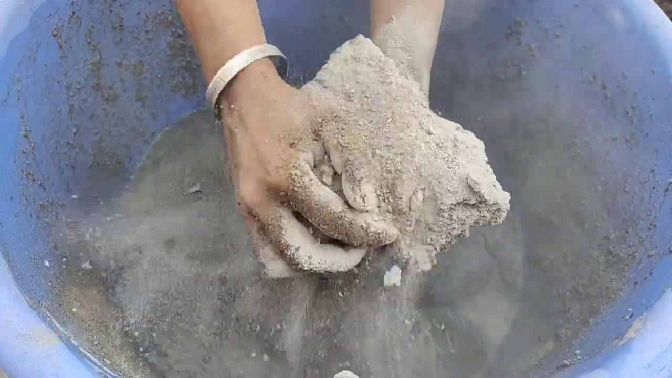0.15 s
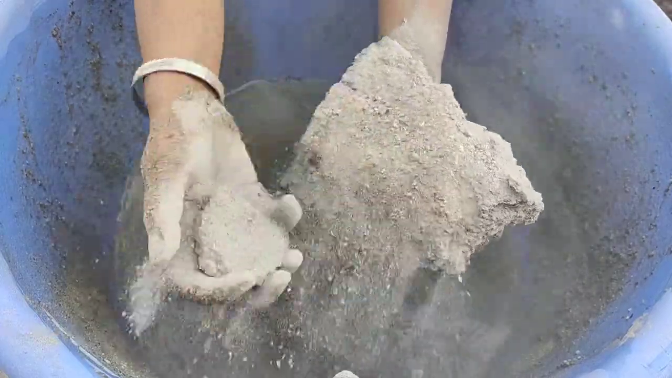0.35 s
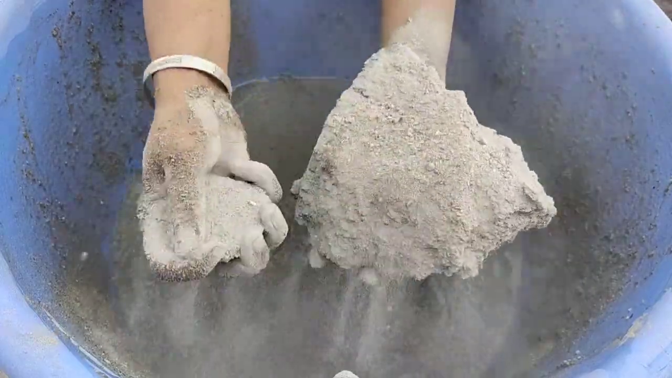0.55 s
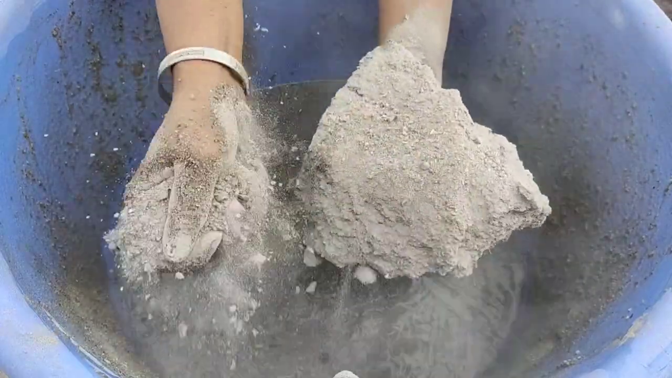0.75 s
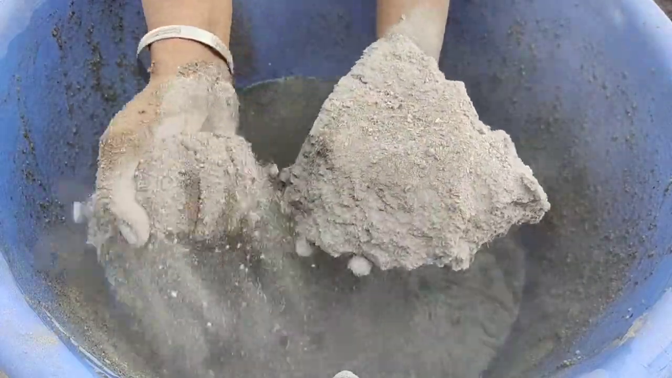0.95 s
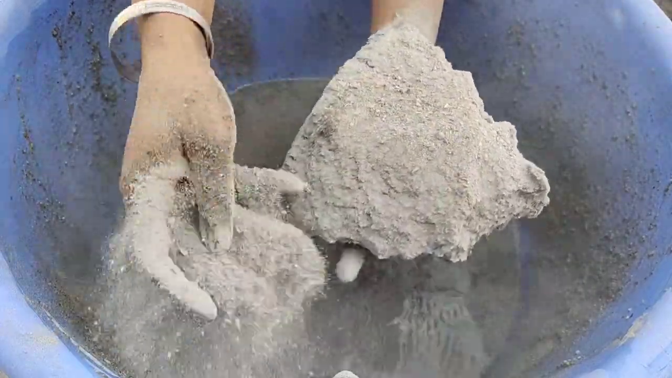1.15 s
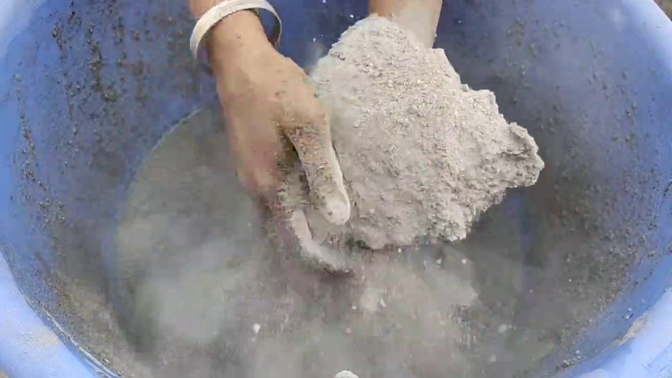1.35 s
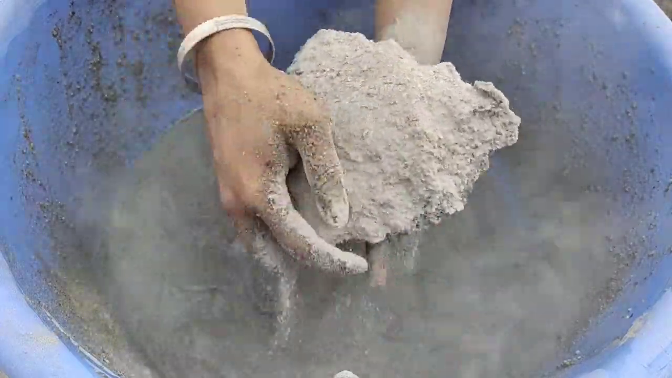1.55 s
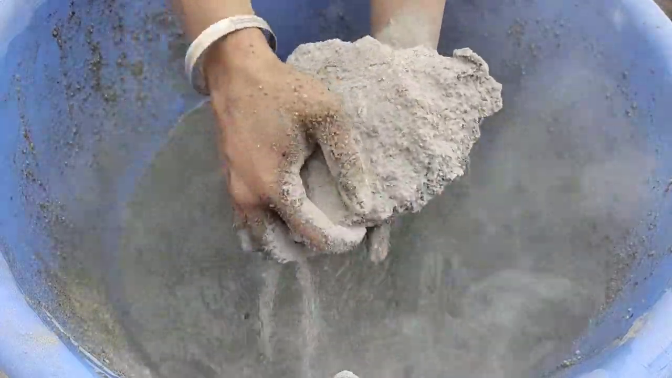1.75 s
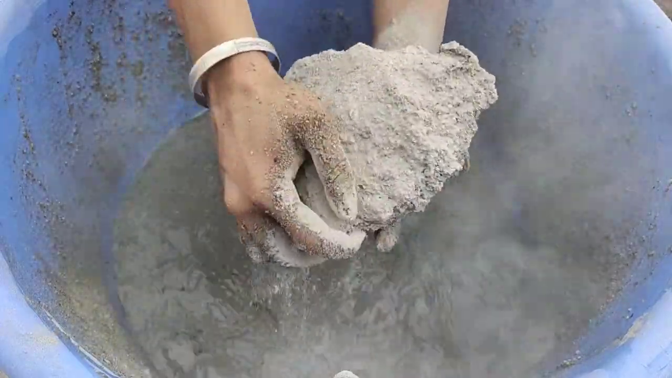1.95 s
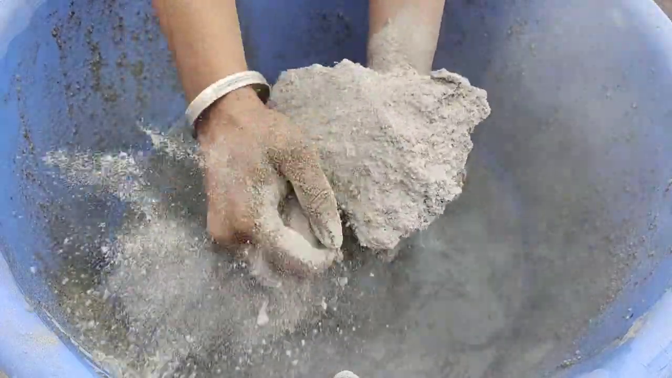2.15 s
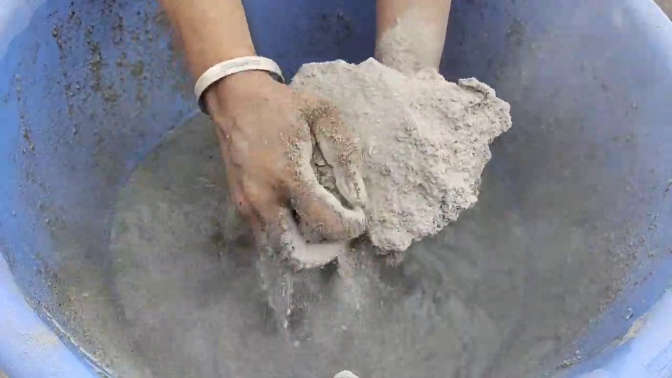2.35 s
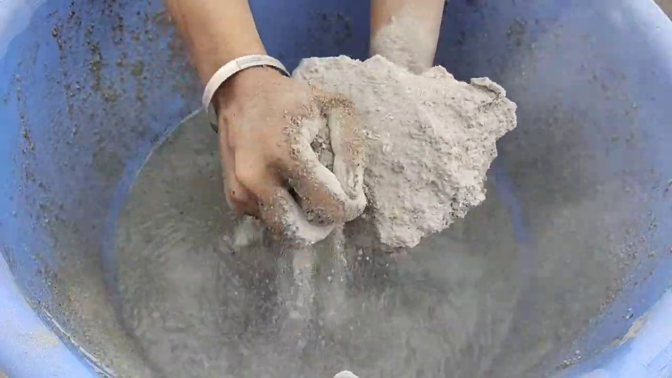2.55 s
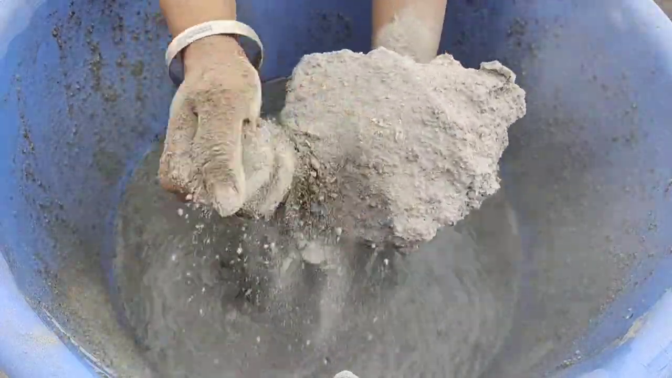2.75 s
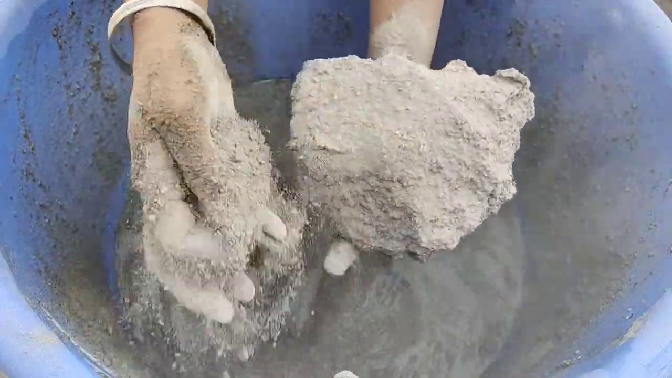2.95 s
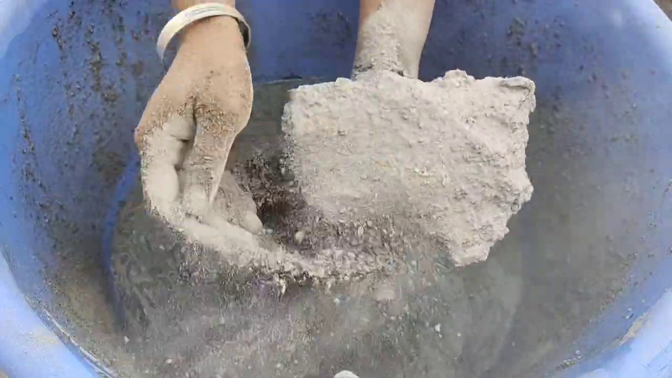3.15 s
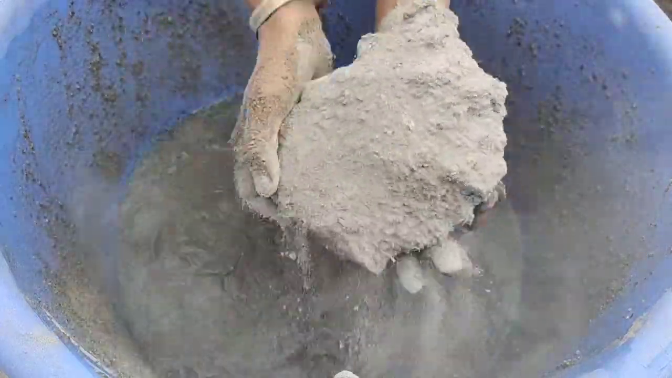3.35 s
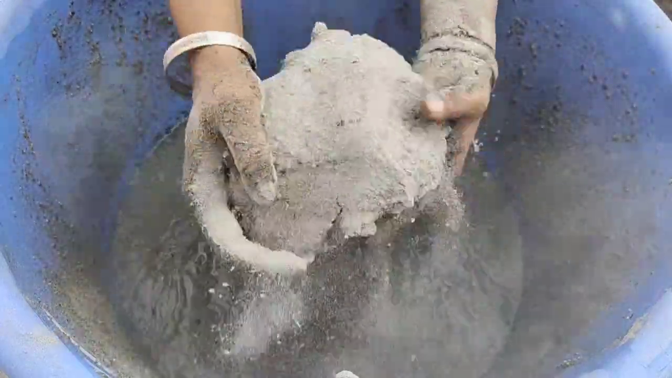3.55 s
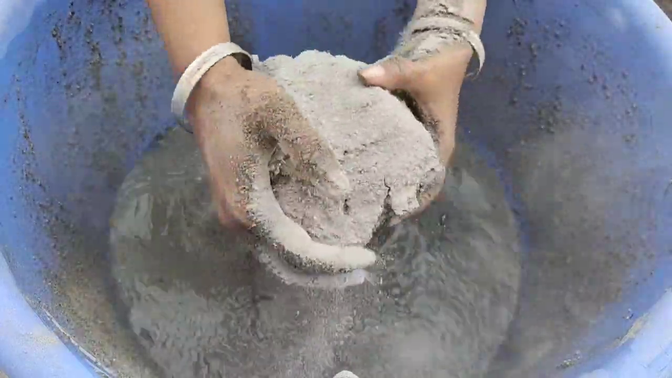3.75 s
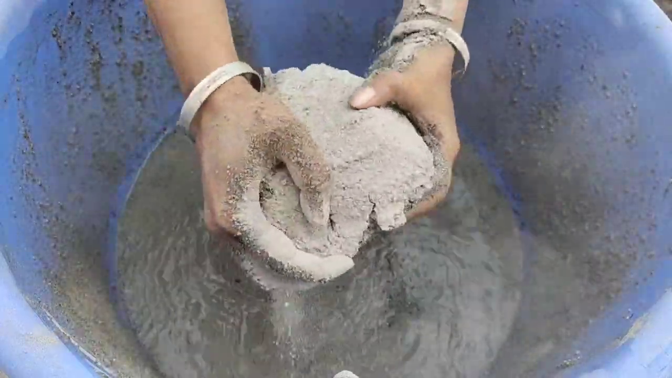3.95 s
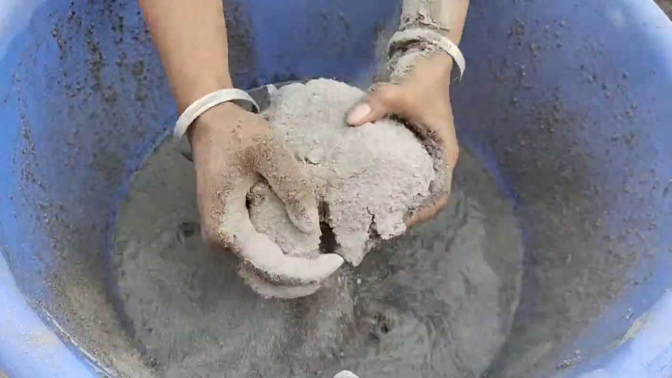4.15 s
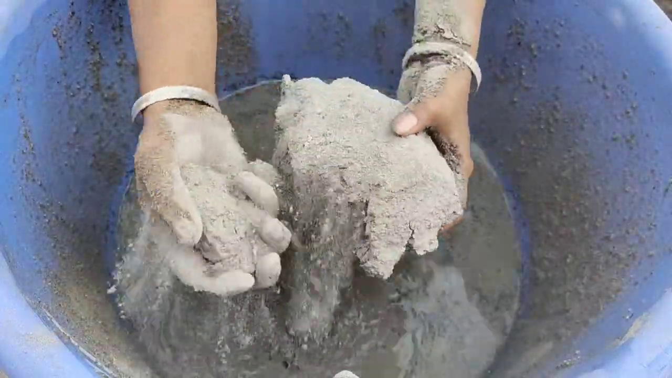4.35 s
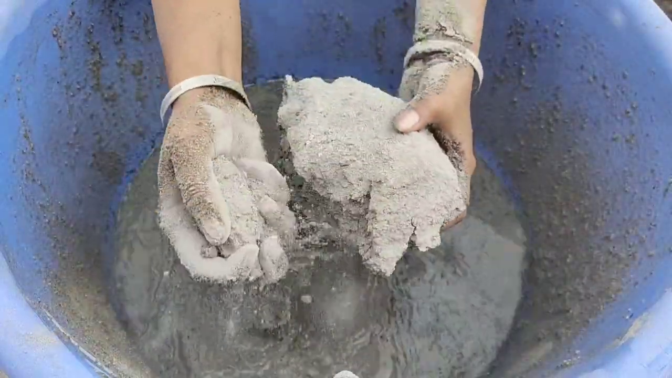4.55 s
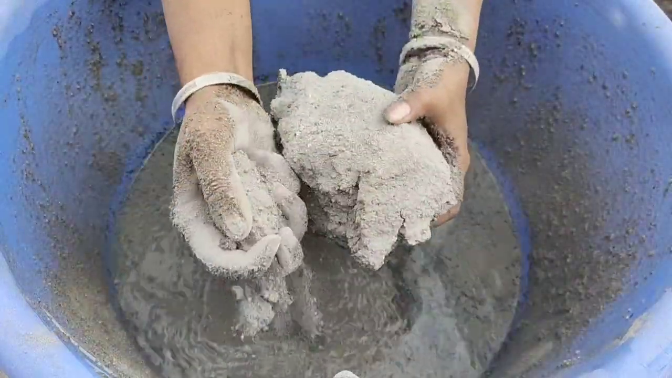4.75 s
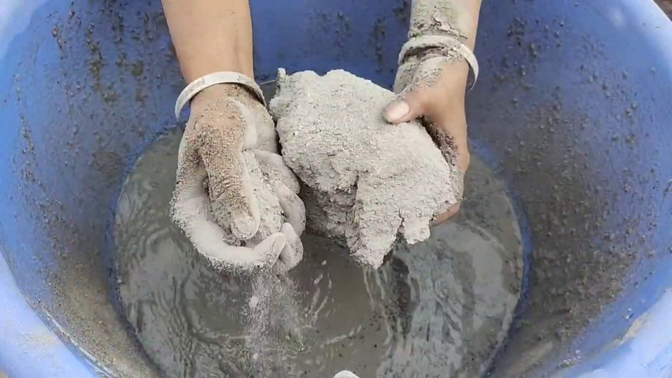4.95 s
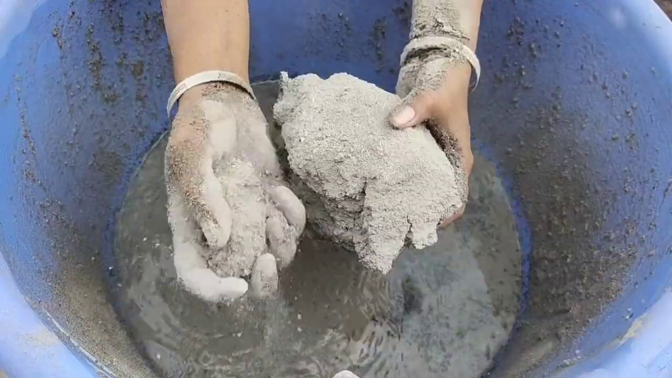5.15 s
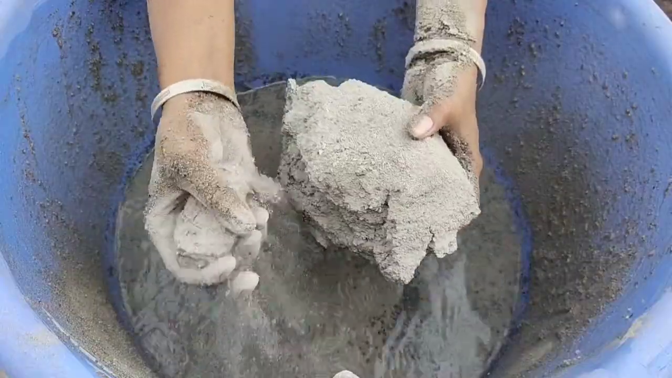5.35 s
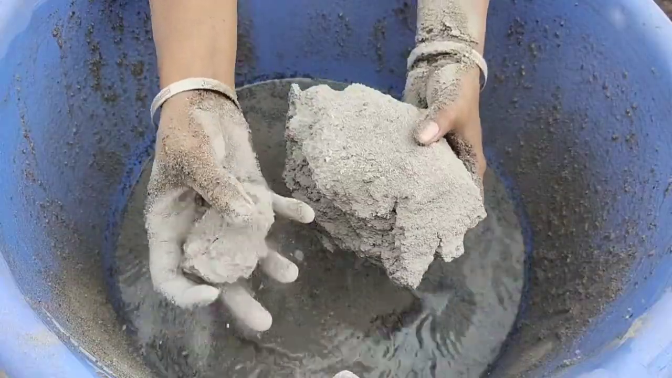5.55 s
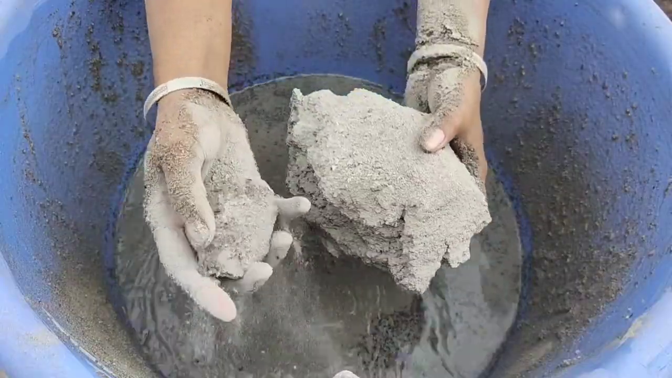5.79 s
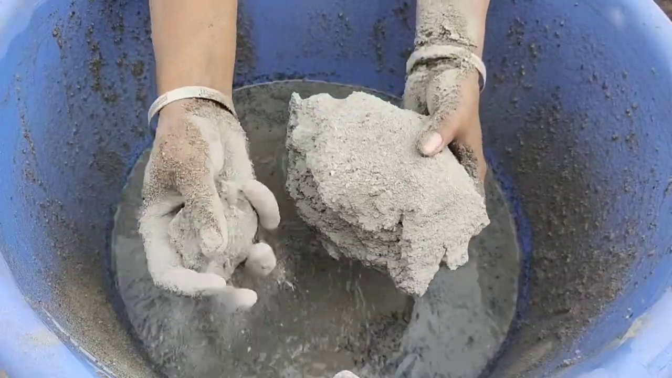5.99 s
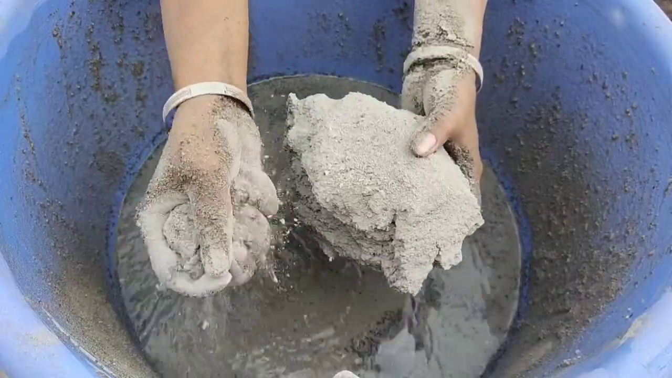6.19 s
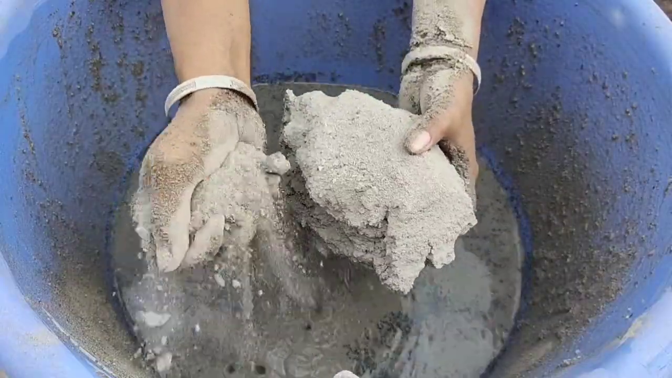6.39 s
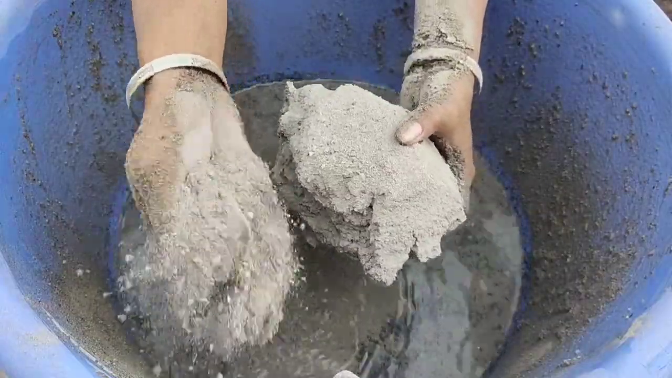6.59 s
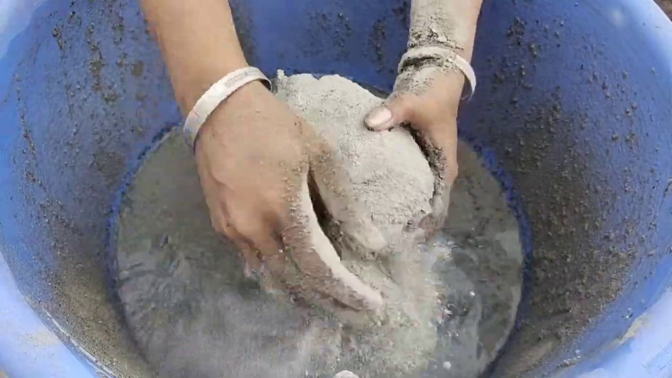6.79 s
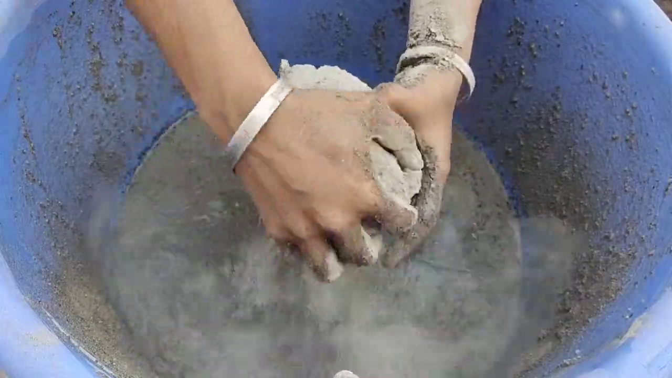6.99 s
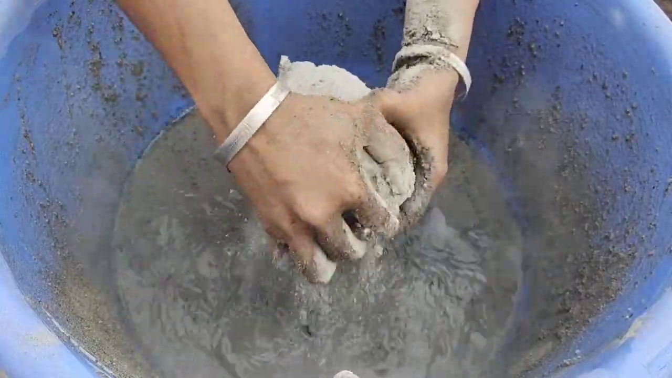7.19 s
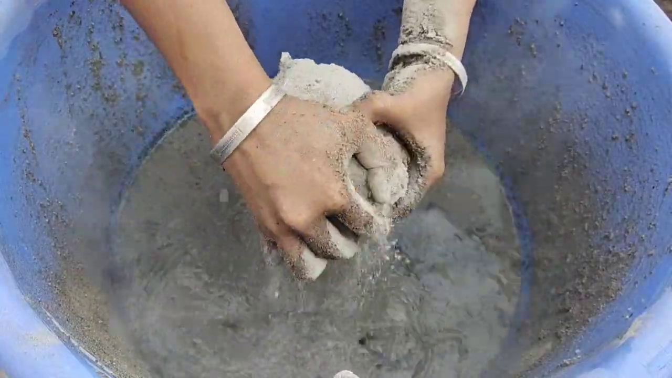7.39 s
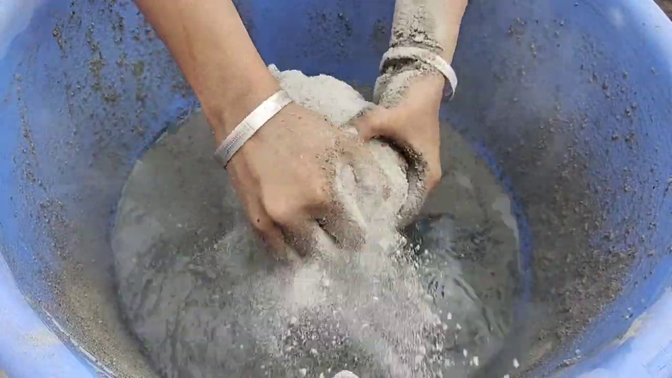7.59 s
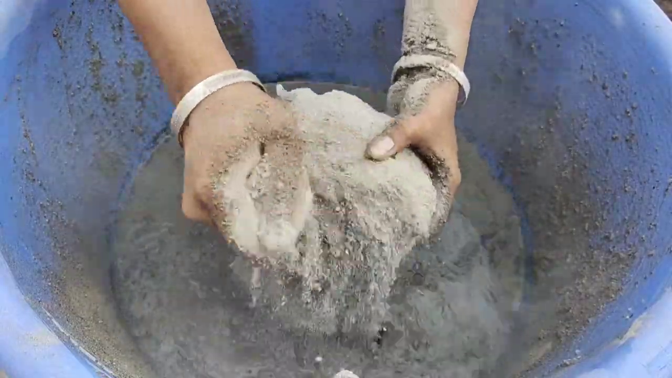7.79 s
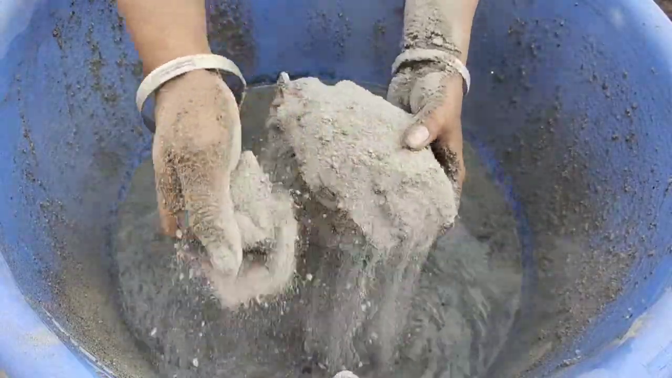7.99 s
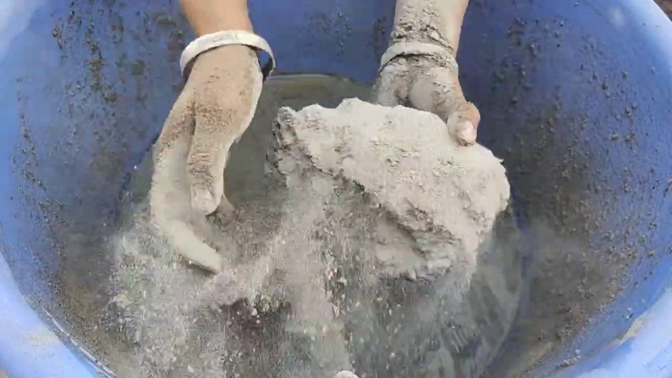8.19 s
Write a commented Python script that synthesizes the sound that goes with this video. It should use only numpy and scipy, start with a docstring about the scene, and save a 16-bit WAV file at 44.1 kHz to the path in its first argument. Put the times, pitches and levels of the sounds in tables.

```python
"""Hands crumble dry cement over a plastic tub of water, close to a microphone.
Crushed dust hisses as shaped noise made of many tiny fractures; grit patters on the water as a dense
rain of short bubble tones; lumps plop in with an impact, a push of water and a longer bubble tone, and
hard grains snap as noise bursts. Resonances and a short wash ring the tub after these landings and snaps.
A low outdoor rumble lies underneath, with a passing hum and a few dull bumps."""
import sys
import numpy as np
from scipy import signal
from scipy.fft import rfft, irfft
from scipy.io import wavfile
from scipy.ndimage import uniform_filter1d

SR = 44100
rng = np.random.default_rng(int(sys.argv[2]) if len(sys.argv) > 2 else 0)


def digitize_waveform(pressure):
    """Quantize a signal to 16-bit integers and store it at the path in sys.argv[1].

    Rows of a 2-D input are taken as channels; values are limited to [-1, 1].
    """
    field = np.atleast_2d(pressure).T
    bounded = np.clip(field, -1, 1)
    quanta = np.round(bounded * 32767).astype(np.int16)
    wavfile.write(sys.argv[1], SR, quanta)


N = 362922


def gain_of(db):
    """Logarithmic level: decibels to amplitude gain."""
    return 10 ** (np.asarray(db) / 20)


def evened(x):
    """Energy normalisation: scales to rms 1."""
    return x / np.sqrt(np.mean(x ** 2) + 1e-20)


def coloured(x, points):
    """Linear filtering: weights the spectrum by gains interpolated over log frequency."""
    table_hz, table_db = np.transpose(points)
    hz = np.fft.rfftfreq(N, 1 / SR)
    gain_db = np.interp(np.log(hz + 1), np.log(table_hz + 1), table_db)
    return irfft(rfft(x) * gain_of(gain_db), N)


def wander(seconds):
    """Random modulation: twice-averaged noise of rms 1 that changes over the given time."""
    size = max(int(seconds * SR), 2)
    noise = rng.standard_normal(N)
    return evened(uniform_filter1d(uniform_filter1d(noise, size), size))


def add(mix, start_s, sound):
    """Superposition: mixes a sound in at a time."""
    part = mix[round(start_s * SR):][:len(sound)]
    part += sound[:len(part)]


def swells(rows, fade_s):
    """Power addition: sums (start_s, length_s, rise_s, level_db) envelopes that rise, hold and fade."""
    power = np.zeros(N)
    for start_s, length_s, rise_s, level_db in rows:
        t = np.arange(0, length_s + 8 * fade_s, 1 / SR)
        rise = np.minimum(t / max(rise_s, .001), 1)
        fade = np.exp(-np.maximum(t - length_s, 0) / fade_s)
        add(power, start_s, (gain_of(level_db) * rise * fade) ** 2)
    return power


# Handfuls squeezed and let fall: start_s, length_s, dust_db (hiss), patter_db (fall of grit, before scaling)
SQUEEZES = [(0.161, 0.19, -39.5, -37), (0.484, 0.21, -44, -39.5), (0.753, 0.27, -36, -43),
            (0.907, 0.29, -44.5, -37.5), (1.221, 0.32, -38, -36), (1.563, 0.42, -48, -53),
            (2.202, 0.33, -40.5, -38.5), (2.457, 0.35, -38, -40), (2.81, 0.39, -42.5, -41),
            (3.168, 0.28, -38, -37.5), (3.451, 0.38, -41, -44), (3.842, 0.35, -45.5, -50.5),
            (4.192, 0.15, -45.5, -39), (4.453, 0.41, -41, -42.5), (4.893, 0.36, -50.5, -46.5),
            (5.376, 0.18, -45.5, -54.5), (6.102, 0.16, -43, -64), (6.221, 0.38, -37, -38),
            (6.578, 0.32, -47.5, -38.5), (6.879, 0.19, -38.5, -35.5), (7.105, 0.13, -46, -59),
            (7.354, 0.28, -52, -43), (7.659, 0.28, -41, -36.5), (7.917, 0.26, -42.5, -38.5)]
SQUEEZE_RISE_S, SQUEEZE_FADE_S = 0.068, 0.071
TRICKLE_DUST_DB, TRICKLE_PATTER_DB = -52, -50.5  # a little always sifts through the fingers


def squeezing(column, trickle_db):
    """Intermittent driving power: one level column of the squeezes adds to a constant trickle."""
    rows = [(row[0], row[1], SQUEEZE_RISE_S, row[column]) for row in SQUEEZES]
    return swells(rows, SQUEEZE_FADE_S) + gain_of(trickle_db) ** 2


def dust_power():
    """Source power of the crushed dust in the squeezes and the trickle."""
    return squeezing(column=2, trickle_db=TRICKLE_DUST_DB)


# Fingers tearing across the chunk: start_s, length_s, rise_s, level_db
SCRAPES = [(0.089, 0.051, 0.0045, -28), (0.203, 0.015, 0.017, -32), (0.735, 0.026, 0.0079, -31.5),
           (0.782, 0.015, 0.018, -26.5), (0.834, 0.0074, 0.0057, -27.5), (2.139, 0.049, 0.0051, -28),
           (3.264, 0.04, 0.02, -30.5), (4.092, 0.056, 0.0047, -32.5), (4.622, 0.0086, 0.0086, -24),
           (5.198, 0.0039, 0.0054, -30.5), (7.255, 0.056, 0.026, -33.5), (7.445, 0.022, 0.0068, -32),
           (7.524, 0.048, 0.032, -31), (7.56, 0.032, 0.022, -24), (7.615, 0.025, 0.012, -30.5)]
SCRAPE_FADE_S = 0.011  # time constant of the hiss once the fingers let go
# Spectrum of the crushed dust: frequency_hz, relative_density_db
DUST_SPECTRUM = [(300, -10), (1000, -5), (2200, -3), (4200, -13), (6500, -8.5), (10200, -12.5), (16000, -4)]


def dust():
    """Fracture noise: thousands of tiny breaks a second, in clumps as the fingers slip, drifting in colour."""
    size_db = 6.4 * np.minimum(rng.exponential(1, N), 3.5)
    breaking = rng.random(N) < .08
    fractures = evened(gain_of(size_db) * breaking * rng.standard_normal(N))
    cracks = fractures + 2.06 * rng.standard_normal(N)
    spectrum = signal.stft(coloured(cracks, DUST_SPECTRUM), nperseg=256)[2]
    # patches of time and frequency grow louder or softer together
    patches = rng.standard_normal(spectrum.T.shape)
    patches = uniform_filter1d(patches, size=14, axis=0)
    patches = evened(uniform_filter1d(patches, size=18, axis=1))
    drifting = signal.istft(spectrum * gain_of(2.0 * patches.T), nperseg=256)[1][:N]
    clumps_db = 2. * wander(0.0056) + 1.33 * wander(0.0028)
    power = dust_power() + swells(SCRAPES, SCRAPE_FADE_S)
    return np.sqrt(power) * evened(drifting * gain_of(clumps_db))


def bubble(hz, cycles, tick, thud, glide=0.00016):
    """Bubble resonance: after impact and push, a dying tone rises as the bubble nears the surface."""
    t = np.arange(3000) / SR
    turns = t * hz
    decay = gain_of(-60 * turns / max(cycles, 2))
    tone = np.sin(2 * np.pi * turns * (1 + glide * turns)) * decay
    onset = 1 - np.exp(-turns / 0.59)
    impact = uniform_filter1d(rng.standard_normal(3000), size=5) * np.exp(-t / 0.00082)
    push = np.sin(2 * np.pi * 260 * t) * np.exp(-t / 0.0028)
    weight = (1000 / hz) ** 0.5  # larger lumps trap lower bubbles and hit harder
    splash = tone * onset + weight * (tick * impact / abs(impact).max() + thud * push)
    return signal.lfilter([1, -1], [1, -.975], splash)  # a small splash sends out no deep bass


# A heavier fall carries coarser grit, with lower bubbles
GRIT_HZ, GRIT_DB, COARSER_DB_PER_OCTAVE = 2164, -43, 18.5
FINER_DB_PER_OCTAVE = 27  # more dust against the patter means smaller grit
# Grain sizes scatter widely in a thin trickle and even out in a heavy fall
SPREAD_DB, EVENER_PER_DB = 4.5, 0.27


def patter():
    """Random bubble ensemble: each grain leaves a short tone, and a heavy fall brings denser grains."""
    level_db = 10 * np.log10(squeezing(column=3, trickle_db=TRICKLE_PATTER_DB))
    powder_db = 10 * np.log10(dust_power()) - level_db  # a dusty handful falls finer and denser
    coarser_octaves = (level_db - GRIT_DB) / COARSER_DB_PER_OCTAVE
    middle_hz = GRIT_HZ * 2 ** (powder_db / FINER_DB_PER_OCTAVE - coarser_octaves)
    per_second = 520 * gain_of(1.3 * (level_db + 45.5) + powder_db + 3. * wander(0.012))
    spread_db = np.maximum(SPREAD_DB - EVENER_PER_DB * (level_db - GRIT_DB), 1)

    pitches_hz = np.geomspace(500, 7500, num=500)
    grains = []
    for hz, (u, v) in zip(pitches_hz, rng.random((len(pitches_hz), 2))):
        cycles = 5 * 7.1 ** u
        grain = bubble(hz, cycles, glide=0.025 * v, tick=0.51, thud=0.21)[:1200]
        grains.append(np.sqrt(12 / cycles) * grain)  # longer tones start softer

    out = np.zeros(N)
    falls, kind, luck, sign = rng.random((N, 4)).T
    for at in np.flatnonzero(falls < per_second / SR):
        k = int(kind[at] * len(pitches_hz))
        octaves = np.log2(pitches_hz[k] / middle_hz[at])
        # middle-sized grit is loudest, big grains are few
        colour_db = -(8.5 if octaves < 0 else 2.6) * octaves ** 2
        size_db = spread_db[at] * min(-np.log(luck[at] + 1e-9), 3.0) - powder_db[at] / 2
        add(out, at / SR, np.sign(sign[at] - .5) * gain_of(size_db + colour_db) * grains[k])
    return gain_of(0.97 * (level_db + 43.0) - 46.5) * evened(out)


# Lumps that land and trap a bubble: start_s, level_db (before the tub), pitch_hz
PLOPS = [(0.247, -19, 1170), (0.264, -23, 1150), (0.277, -9, 1140), (0.311, -25, 1570), (0.341, -13, 1510),
         (0.391, -23, 1870), (0.439, -18, 3070), (0.456, -8, 1040), (0.458, -13, 910), (0.569, -18, 2300),
         (0.577, -14, 1090), (0.662, -23, 1200), (0.962, -17, 1120), (0.982, -26, 2040),
         (0.991, -11.5, 1920), (1.097, -13.5, 1040), (1.117, -26, 2260), (1.177, -17.5, 1040),
         (1.392, -22, 1090), (1.408, -17, 1400), (1.505, -15, 1050), (1.542, -19, 1130), (1.693, -32, 2750),
         (1.809, -22, 2370), (1.87, -33.5, 1280), (1.909, -27, 1970), (2.202, -20, 1200),
         (2.307, -25, 1130), (2.363, -21.5, 1190), (2.569, -18, 1660), (2.611, -25, 1840),
         (2.706, -17, 1720), (2.753, -20.5, 1330), (2.791, -27.5, 1260), (2.99, -24, 1740),
         (3.012, -22, 4020), (3.04, -19, 976), (3.089, -14.5, 1800), (3.157, -18.5, 1010),
         (3.202, -20, 980), (3.397, -16, 2370), (3.457, -22, 1070), (3.57, -31, 1320), (3.672, -27.5, 1250),
         (4.03, -31, 2170), (4.321, -16.5, 2330), (4.519, -23.5, 1480), (4.577, -11, 960),
         (4.604, -18, 630), (4.637, -27, 780), (4.76, -24.5, 910), (4.858, -16.5, 2300),
         (5.055, -17.5, 5400), (5.065, -24.5, 5430), (5.082, -27, 2900), (5.181, -43, 2060),
         (5.238, -20.5, 1350), (5.24, -34, 530), (5.42, -34, 2260), (5.454, -26, 5630),
         (5.477, -30.5, 1500), (5.496, -26.5, 2880), (5.521, -27, 3070), (5.566, -34, 2960),
         (5.587, -36, 2100), (5.604, -26, 1730), (5.682, -21.5, 2020), (5.727, -35.5, 3220),
         (5.774, -36, 1810), (5.809, -20, 1850), (5.848, -30, 3460), (5.902, -31, 3840),
         (5.948, -27.5, 2370), (5.953, -23, 1340), (5.986, -35, 2940), (6.022, -32.5, 2130),
         (6.035, -30.5, 3370), (6.052, -33, 1620), (6.091, -28.5, 2400), (6.554, -9, 970),
         (6.725, -31, 1240), (6.768, -21, 1060), (6.965, -21, 2880), (7.012, -22, 970), (7.032, -17, 1010),
         (7.728, -14, 1980), (7.775, -12, 1110), (7.7956, -8.5, 995), (7.899, -30.5, 424),
         (7.954, -25.5, 653), (7.995, -21, 1920), (8.078, -15, 1150), (8.115, -23, 1280), (8.115, -35, 642),
         (8.197, -15.5, 1200)]
# Cycles to die by 60 dB at -20 dB; a harder landing bursts its bubble sooner
RING_CYCLES, SHORTER_PER_DB = 19, .4
CRUMB_LEAD_S, CRUMB_SPAN_S, CRUMB_DB = .003, 0.014, 0.5  # a lump sheds crumbs that land around it


def plops():
    """Trapped-bubble resonance: heavier lumps hit harder, ring shorter and shed louder crumbs."""
    out = np.zeros(N)
    for start_s, level_db, pitch_hz in PLOPS:
        heft_db = level_db + 20
        cycles = RING_CYCLES * gain_of(-SHORTER_PER_DB * heft_db)
        add(out, start_s, gain_of(level_db) * bubble(pitch_hz, cycles, tick=0.4, thud=0.35))
        crumb_gain = gain_of(level_db + CRUMB_DB + 0.13 * heft_db)
        for when, small in rng.random(size=(4, 2)):
            crumb_hz = pitch_hz * (1.063 + 0.56 * small ** 2)
            crumb = bubble(crumb_hz, 3.8, tick=0.15, thud=0.027)
            add(out, start_s - CRUMB_LEAD_S + when * CRUMB_SPAN_S, crumb_gain * crumb)
    return out


# Hard grains that snap: start_s, level_db (peak, before the tub)
SNAPS = [(0.4563, -36), (3.1055, -9), (4.859, -18), (5.6486, -13), (5.811, -13), (6.249, -12.5),
         (6.651, -16), (6.7508, -13), (7.7958, -20), (7.8995, -11.5)]


def snaps():
    """Brittle fracture: differenced, hence bright, noise dies within a few milliseconds."""
    out, t = np.zeros(N), np.arange(600) / SR
    for start_s, level_db in SNAPS:
        decay = gain_of(-60 * t / 0.0017) + 0.058 * gain_of(-60 * t / 0.0067)
        crack = np.diff(rng.standard_normal(601)) * decay
        add(out, start_s, gain_of(level_db) * crack / abs(crack).max())
    return out


# Resonances of the air and wall of the tub: frequency_hz, width_hz, relative_level_db
TUB_MODES = [(373, 24, 5.5), (601, 65, 10), (887, 38, 7), (1250, 160, -7.5)]


def tub(x):
    """Modal resonance and reflections: the tub rings on after each input, with a short changing wash."""
    t = np.arange(4000) / SR
    ring = np.zeros(4000)
    for hz, width_hz, level_db in TUB_MODES:
        mode = np.exp(-np.pi * width_hz * t) * np.cos(2 * np.pi * hz * t)
        ring += gain_of(level_db) * width_hz / SR * 2 * np.pi * mode
    out = x + signal.oaconvolve(x, 0.55 * ring)[:N]
    turn = np.arange(N) / SR / .09 * np.pi
    for place in range(6):
        echoes = rng.choice([-1., 1.], 4000) * (rng.random(4000) < .3)
        wash = echoes * gain_of(-60 * t / 0.019) * (t > .0008)
        share = np.maximum(np.cos(turn - place * np.pi / 3), 0) ** 2  # landing places take turns
        out += signal.oaconvolve(x * share, gain_of(-7.5) * wash / np.linalg.norm(wash))[:N]
    return out


# Spectrum of the outdoor rumble: frequency_hz, relative_density_db
RUMBLE_SPECTRUM = [(15, -12), (30, 3), (65, -2.5), (120, 0), (256, 0.5), (330, -11.5), (420, -19),
                   (900, -24), (3000, -31)]
RUMBLE_DB = -47


def rumble():
    """Filtered noise: a low outdoor rumble whose level sways gently."""
    sway_db = 1.5 * wander(0.11)
    return gain_of(RUMBLE_DB + sway_db) * evened(coloured(rng.standard_normal(N), RUMBLE_SPECTRUM))


# A faint low hum that swells: start_s, length_s, rise_s, level_db (rms)
HUM = (3.4, .9, .45, -50)
HUM_HZ, HUM_FADE_S = 82, .12


def hum():
    """Amplitude modulation: one pure tone swells and fades."""
    t = np.arange(N) / SR
    return np.sqrt(2 * swells([HUM], HUM_FADE_S)) * np.sin(2 * np.pi * HUM_HZ * t)


# Dull low bumps: start_s, level_db (before the decay), pitch_hz
BUMPS = [(0.101, -31, 37), (2.199, -37, 40), (3.519, -28.5, 49), (6.638, -29, 135), (8.051, -34.5, 119)]


def bumps():
    """Damped oscillation: each bump rises over one cycle and falls by 60 dB in 18 cycles."""
    out, t = np.zeros(N), np.arange(SR) / SR
    for start_s, level_db, pitch_hz in BUMPS:
        turns = pitch_hz * t
        envelope = gain_of(level_db - 60 * turns / 18) * np.minimum(turns, 1)
        add(out, start_s, envelope * np.sin(2 * np.pi * turns))
    return out


def background():
    """Superposition of the swaying rumble, a passing hum and a few bumps."""
    return rumble() + hum() + bumps()


def scene():
    """Superposition of everything above and in the tub, in one channel."""
    in_tub = tub(patter() + plops() + snaps())
    return (in_tub + dust() + background())[None]


# Response of the microphone: frequency_hz, gain_db
MICROPHONE = [(20, -2.5), (10300, 4.5), (12000, -6), (14500, -12.5), (16000, -23)]
EDGE_HZ = 15650


def record(dry):
    """Band limitation: the microphone's response dulls the top, then a steep low-pass ends the band."""
    heard = coloured(dry[0], MICROPHONE)[None]
    low_pass = signal.firwin(511, EDGE_HZ, window=("kaiser", 9), fs=SR)[None]
    return signal.oaconvolve(heard, low_pass, "same")


dry = scene()
out = record(dry)
digitize_waveform(out)
```